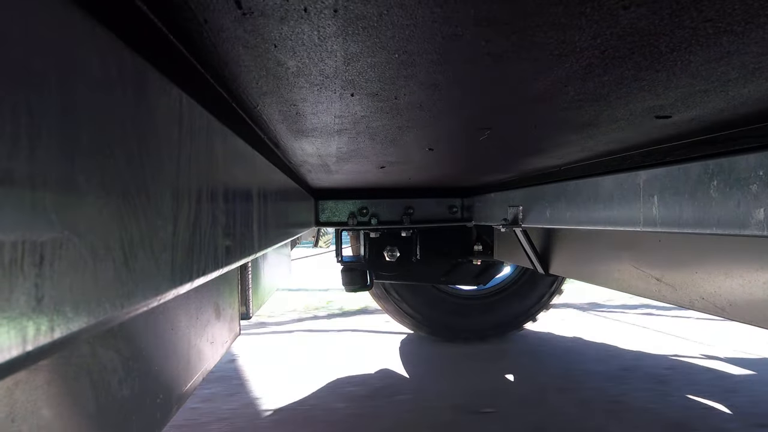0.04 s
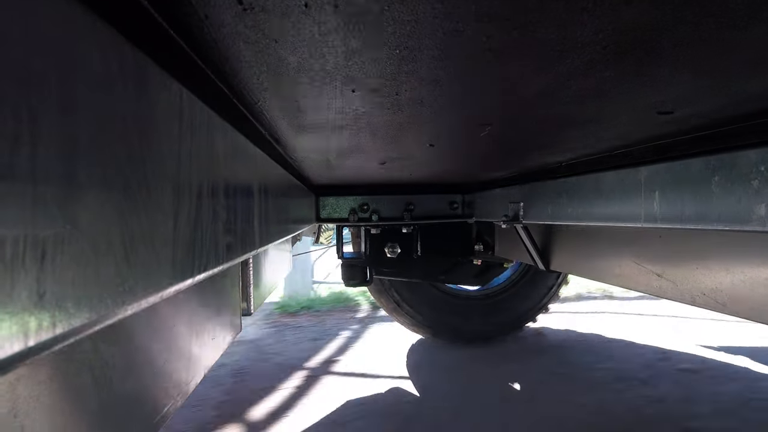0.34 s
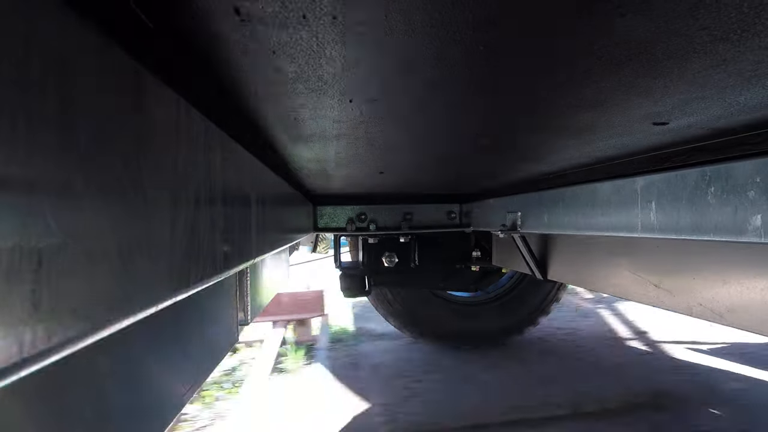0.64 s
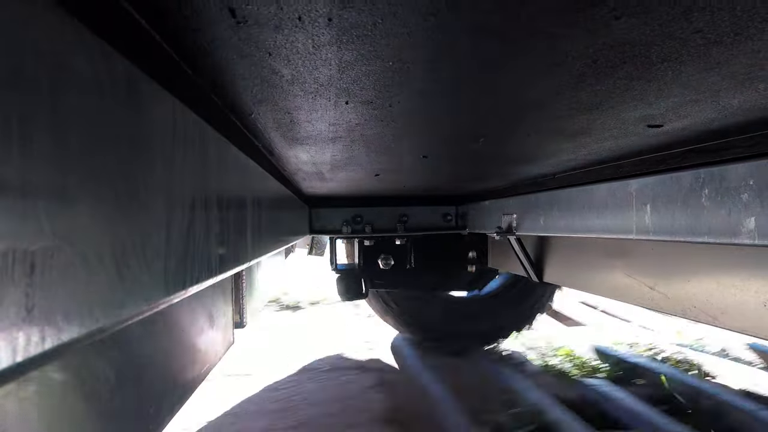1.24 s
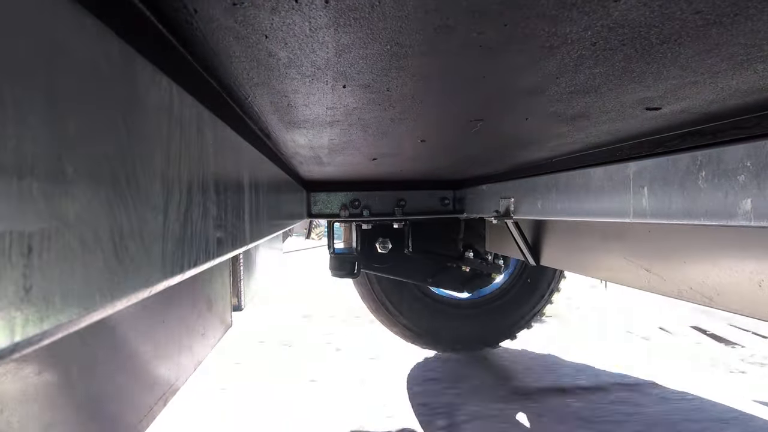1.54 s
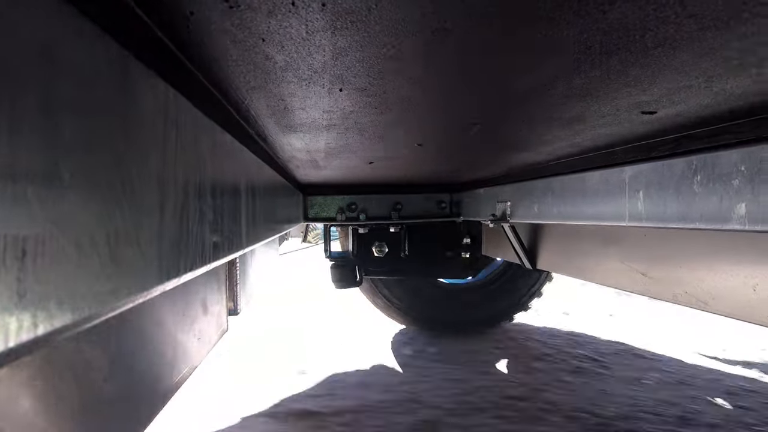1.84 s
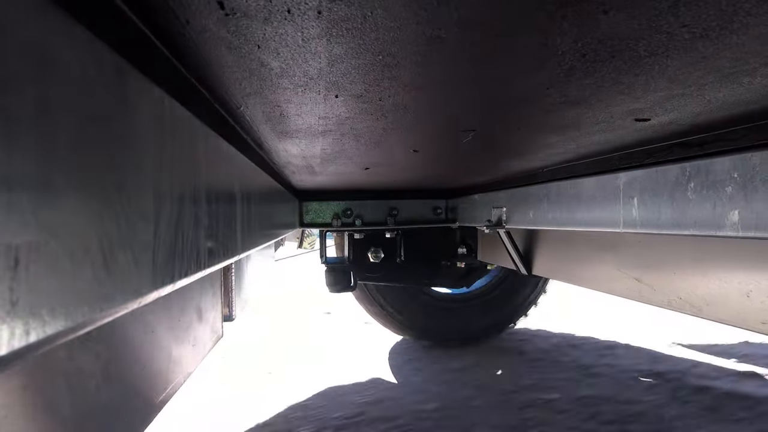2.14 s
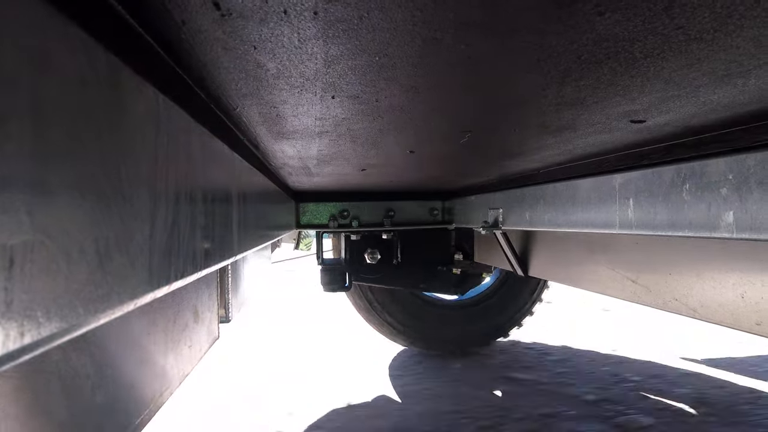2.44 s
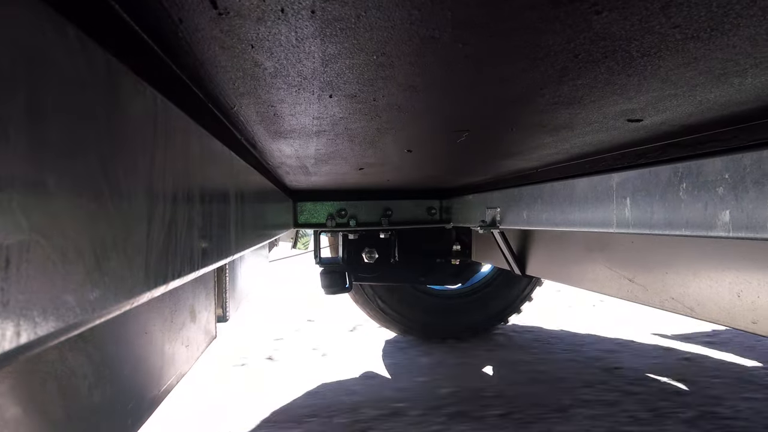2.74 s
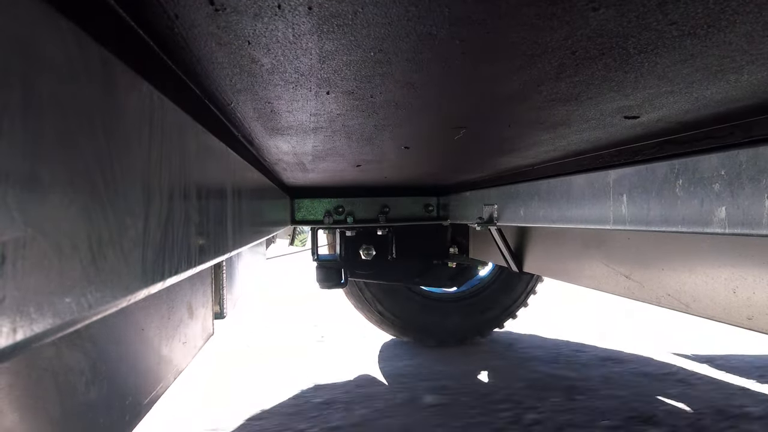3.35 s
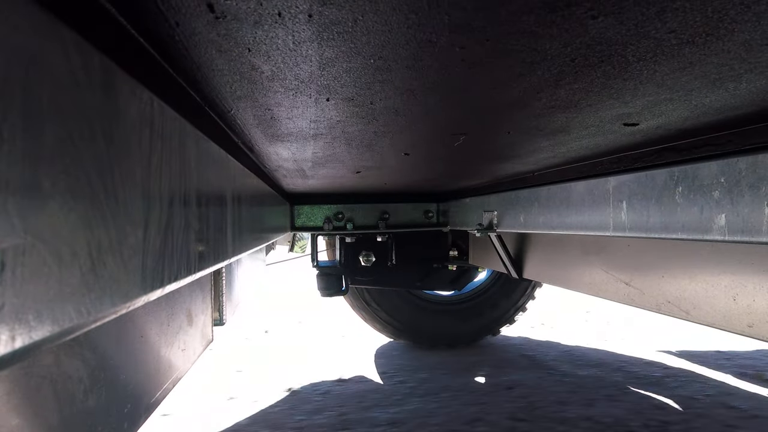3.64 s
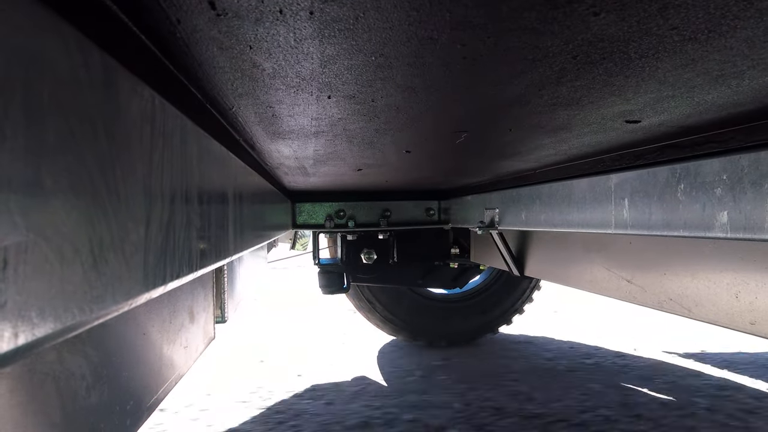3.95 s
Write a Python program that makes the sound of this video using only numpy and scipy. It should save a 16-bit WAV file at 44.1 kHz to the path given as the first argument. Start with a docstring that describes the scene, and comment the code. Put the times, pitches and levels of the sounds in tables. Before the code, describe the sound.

A metal trailer rumbles and rattles along, clanking over a cattle grid, heard from underneath.

```python
"""A hollow boom and the chatter of loose fittings come first: a metal trailer on rough ground,
with the microphone underneath, close beside a wheel. The road shakes the body, the panels drum
and the steel frame clanks. About a second in, the tyre drops onto four bars of a cattle grid;
then the trailer rolls on along a dirt track, grit crunching and stones ticking on the wheel guard."""
import sys
import numpy as np
from scipy import signal
from scipy.fft import rfft, irfft
from scipy.io import wavfile

SR = 44100
rng = np.random.default_rng(int(sys.argv[2]) if len(sys.argv) > 2 else 0)


def wav_record(signal):
    """Record a signal, one row per channel, as 16-bit PCM in the file named by sys.argv[1]."""
    frames = np.transpose(np.atleast_2d(signal))
    bounded = np.clip(frames, -1, 1)
    # unit amplitude maps onto the largest positive 16-bit level
    quanta = np.round(bounded * 32767).astype(np.int16)
    wavfile.write(sys.argv[1], SR, quanta)


N = 176400


def amp(db):
    """Decibels to gain."""
    return 10 ** (np.asarray(db) / 20)


def unit_rms(x):
    """Scales to rms 1."""
    return x / np.sqrt(np.mean(x ** 2) + 1e-20)


def read(points, hz):
    """Reads a table on a log-frequency axis."""
    f, value = np.transpose(points)
    return np.interp(np.log(hz + 1), np.log(f + 1), value)


def level(points):
    """A gain for every sample from (time [s], level [dB]) rows."""
    return amp(np.interp(np.arange(N) / SR, *np.transpose(points)))


def add(mix, start_s, sound):
    """Mixes a sound in at its start time."""
    at = round(start_s * SR)
    sound = sound[max(-at, 0):]
    part = mix[max(at, 0):][:len(sound)]
    part += sound[:len(part)]


def noise(size):
    """White noise."""
    return rng.standard_normal(size)


def coloured(x, db_at):
    """Filters x by a gain in dB over frequency, then scales to rms 1."""
    hz = np.fft.rfftfreq(len(x), 1 / SR) + 1
    return unit_rms(irfft(rfft(x) * amp(db_at(hz)), len(x)))


def octaves(hz):
    """Octaves from the middle of the metallic range."""
    return np.log2(np.clip(hz, 300, 10000) / 2000)


def ripple(hz, depth_db=7, spacing_hz=61.54):
    """The uneven response of sheet metal: random peaks and dips, in dB."""
    return depth_db * np.interp(hz / spacing_hz, np.arange(1024), noise(1024))


def mode(t, hz, db, t60):
    """One decaying resonance with a random phase."""
    return amp(db - 60 * t / t60) * np.sin(2 * np.pi * (hz * t + rng.random()))


def knock(colour, rise_s, fall_s):
    """A damped blow that dies before any pitch forms."""
    t = np.arange(32768) / SR
    envelope = np.minimum(t / rise_s, 1) * np.exp(-np.maximum(t - rise_s, 0) / fall_s)
    return coloured(noise(len(t)), colour) * envelope


# Rumble of the chassis above the microphone (frequency [Hz], gain [dB])
SWAY_COLOUR = [(8, -75), (27, 2.5), (45, -34), (120, -130)]

def sway():
    """The chassis sways slowly, at the bottom edge of hearing."""
    return amp(-29.5) * coloured(noise(N), lambda f: read(SWAY_COLOUR, f))


def cavity(centre_hz, width_hz, steadiness=0.47):
    """A resonance of the hollow body, shaken without pause by the road."""
    band = coloured(noise(N), lambda f: -20 * np.log10(1 + ((f - centre_hz ** 2 / f) / width_hz) ** 2))
    envelope = abs(signal.hilbert(band))
    steadied = band / (envelope + 0.036) ** steadiness
    return coloured(steadied, lambda f: -20 * np.log10(1 + (f / 600) ** 2))


# Deep and upper resonance of the body, heard from below (time [s], relative level [dB])
DEEP_BOOM_LEVEL = [(0, -8), (.3, -13), (.7, -15.5), (1.0, -11), (1.45, -14.5), (1.65, -18.5), (1.95, -15),
                   (2.25, -17), (2.5, -13.5), (3.65, -12.5), (3.85, -11)]
UPPER_BOOM_LEVEL = [(0, -21), (.45, -19.5), (.9, -20.5), (1.5, -19), (1.7, -23), (2.05, -16), (2.3, -24.5),
                    (2.78, -14), (2.95, -19.5), (3.5, -23.5), (4, -23.5)]

def boom():
    """The hollow body booms at two cavity resonances."""
    deep = amp(-1) * level(DEEP_BOOM_LEVEL) * cavity(centre_hz=57.1, width_hz=24.7)
    upper = amp(3) * level(UPPER_BOOM_LEVEL) * cavity(centre_hz=100.2, width_hz=59.7)
    return deep + upper


# Floor and side panels overhead (frequency [Hz], gain [dB])
PANEL_COLOUR = [(90, -6), (160, 4), (200, -3), (245, 2.5), (300, -4.5), (385, 3), (470, -8.5), (590, -3),
                (690, -19), (860, -16), (1200, -22.5), (1800, -44.5), (14000, -120)]
# Their drumming along the way (time [s], relative level [dB])
DRUM_LEVEL = [(0, -24.5), (.5, -23.5), (.62, -31.5), (.82, -28.5), (.98, -18.5), (1.4, -21), (1.62, -16),
              (1.76, -27), (1.95, -18.5), (2.25, -34.5), (2.43, -24.5), (2.9, -24), (3.25, -28.5),
              (3.65, -25.5), (4, -35.5)]

def drumming():
    """The panels drum as the trailer rolls."""
    return amp(-1.5) * level(DRUM_LEVEL) * coloured(noise(N), lambda f: read(PANEL_COLOUR, f))


# Tyre on grit, close beside the microphone (time [s], relative level [dB])
GRIT_LEVEL = [(0, -28.5), (.6, -34.5), (1.0, -32), (1.5, -32.5), (1.76, -43.5), (2.0, -37), (2.2, -43),
              (2.4, -34.5), (2.72, -37), (2.87, -32.5), (3.04, -34), (3.13, -39), (3.27, -34.5), (4, -35)]
# Colour of its crunch (frequency [Hz], gain [dB])
CRUNCH_COLOUR = [(200, -12), (560, 4), (720, -13), (950, 0), (1350, -4), (1800, -10), (2200, -18),
                 (3000, -17), (4400, -22), (5200, -26), (7500, -29), (10000, -43), (12500, -49),
                 (14500, -48), (16000, -64)]

def grit(grains_per_s=900, spread_db=2, scatter_s=0.00096, clump_hz=21.9, fizz_hz=1700):
    """Grains crunch under the tread in uneven clumps; their fizz grows faster than their body."""
    grains = noise(N) * amp(spread_db * np.minimum(rng.exponential(1, N), 4))
    grains *= rng.random(N) < grains_per_s / SR
    t = np.arange(1024) / SR
    scatter = noise(len(t)) * np.exp(-t / scatter_s)
    crunch = unit_rms(signal.oaconvolve(grains, scatter)[:N])
    clumps = amp(coloured(noise(N), lambda f: -20 * np.log10(1 + (f / clump_hz) ** 2 + (5 / f) ** 2)))
    hiss = 0.9 * noise(N)
    sound = coloured(crunch + hiss, lambda f: read(CRUNCH_COLOUR, f) + ripple(f, depth_db=3.5))
    low = irfft(rfft(sound) / (1 + (np.fft.rfftfreq(N, 1 / SR) / fizz_hz) ** 4), N)
    load = level(GRIT_LEVEL)
    fizz = (sound - low) * (load / amp(-37)) ** 0.6
    return load * clumps * (low + fizz)


# Stones off the track, at the near wheel (time [s], level [dB], brightness [dB/octave])
STONE_HITS = [(0.523, -19.5, -1), (0.887, -33, -5), (0.926, -25.5, -0.5), (1.508, -22.5, -8),
              (1.874, -28, -1.5), (1.889, -22.5, -2), (1.92, -33.5, 2.5), (2.041, -36, 3),
              (2.44, -29.5, -.5), (2.523, -28.5, 0), (2.543, -27.5, -3), (2.899, -33.5, 2.5),
              (3.028, -33.5, 4), (3.057, -26.5, 1), (3.114, -37, 0.5), (3.432, -25.5, 0.5),
              (3.622, -27.5, -2), (3.705, -18, -2.5), (3.775, -21, -3), (3.784, -28.5, -7)]
# Colour of their knock (frequency [Hz], gain [dB])
STONE_KNOCK_COLOUR = [(150, -18), (550, 6), (720, -3), (1000, 7), (1750, -3), (2300, -6.5), (5300, -16),
                      (7500, -20.5), (11000, -37.5), (15000, -51.5)]
# Modes of the wheel guard (frequency [Hz], level [dB], t60 [s])
WHEEL_GUARD_MODES = [(943, -3, .1), (1220, -7.5, 0.11), (1766, -5, 0.052)]

def stones(mix):
    """Stones knock on the wheel guard, which rings briefly; some knocks are dull, others bright."""
    for start_s, db, bright_db in STONE_HITS:
        colour = lambda f: read(STONE_KNOCK_COLOUR, f) + bright_db * octaves(f)
        sound = knock(colour, rise_s=0.0011, fall_s=0.017)
        t = np.arange(len(sound)) / SR
        for hz, mode_db, t60 in WHEEL_GUARD_MODES:
            detuned_hz = hz * (1 + 0.021 * noise(1))
            envelope = amp(mode_db + bright_db * octaves(hz) - 60 * t / t60)
            sound += envelope * np.sin(2 * np.pi * detuned_hz * t)
        add(mix, start_s, amp(db) * sound)


# Jolts in the panels overhead (time [s], level [dB], centre [Hz], fall time [s])
JOLTS = [(0.136, -12.5, 253, 0.011), (0.216, -10.5, 222, 0.012), (.394, -14.5, 206, 0.069),
         (.863, -15.5, 253, 0.027), (1.003, -20.5, 602, 0.031), (1.509, -12, 475, 0.088),
         (1.833, -10, 218, 0.029), (1.872, -15, 392, 0.046), (2.03, -13.5, 360, 0.016),
         (2.545, -19.5, 407, 0.052), (2.899, -15, 282, 0.01), (3.056, -14, 510, 0.017),
         (3.322, -14, 283, 0.014), (3.621, -18.5, 530, 0.013)]

def thumps(mix, half_width_octaves=0.38):
    """Each jolt thumps the panels in one narrow band."""
    for start_s, db, hz, fall_s in JOLTS:
        band_db = lambda f: -10 * np.log10(1 + (np.log2(f / hz) / half_width_octaves) ** 4)
        thump = knock(lambda f: read(PANEL_COLOUR, f) + band_db(f), rise_s=0.0057, fall_s=fall_s)
        add(mix, start_s, amp(db) * thump)


# Full ring time of the steel frame above the microphone (frequency [Hz], t60 [s])
FRAME_RING = [(200, 0.084), (900, 0.8), (2500, 0.58), (6000, 0.49), (8500, 0.27), (15000, 0.7)]
# Its clear modes (frequency [Hz], relative level [dB], full t60 [s])
FRAME_MODES = [(595, -3.5, 0.32), (855, -6.5, 0.83), (1213, 2.5, 0.14), (2134, -24.5, .4),
               (2930, -11, 0.28), (4040, -20.5, 0.16), (5420, -16.5, .45), (5895, -23.5, 0.51)]

def frame_blow(spectrum, bright_db, crack_db, sustain, crack_s=0.0055):
    """One blow on the frame: a crack, a dense ring that dulls, and a few clear modes."""
    size = 32768
    t = np.arange(size) / SR
    colour = lambda f: read(spectrum, f) + bright_db * octaves(f) + ripple(f)
    hz, when, bands = signal.stft(coloured(noise(size), colour), SR, nperseg=256)
    decay = amp(-60 * when / (sustain * read(FRAME_RING, hz)[:, None]))
    ring = signal.istft(bands * decay, SR)[1][:size]
    modes = sum(mode(t, f, db + bright_db * octaves(f), sustain * t60) for f, db, t60 in FRAME_MODES)
    crack = coloured(noise(size), colour) * amp(crack_db) * np.exp(-(t / crack_s) ** 2)
    attack = np.minimum(t / 0.000074, 1)
    return (ring + amp(-6.5) * modes + crack) * attack


# Bouts of chatter, heard from under the frame
# (time [s], length [s], level [dB], brightness [dB/octave], jingle [dB], pitch [Hz])
RATTLE_BOUTS = [(-.03, 0.075, -19, -2, -13, 1926), (0.086, 0.074, -20, -0.5, 5.5, 1486),
                (0.159, 0.092, -26, -2.2, -14, 1555), (0.397, 0.086, -19, -3, -10, 1180),
                (.479, 0.047, -26, 0.8, -9, 1798), (0.669, 0.12, -26, -1.5, -5, 1950),
                (1.063, 0.045, -30.5, 0, 5.5, 2087), (1.17, 0.023, -23, -13, 3, 3080)]
# Colour of the frame under a fitting's blows (frequency [Hz], gain [dB])
RATTLE_COLOUR = [(200, -16), (550, 9.5), (700, -1.5), (950, -4), (1900, 0.5), (2800, -3.5), (4000, -9.5),
                 (6100, -12.5), (7200, -21.5), (11000, -24.5), (12500, -38), (14500, -42)]
# Modes of a fitting (frequency [multiple of its pitch], level [dB])
FITTING_MODES = [(1, 1), (1.037, -5), (1.993, -8), (2.272, -6.5), (2.94, -10), (3.269, -6.5)]

def rattles(mix, blows_per_s=460, spread_db=2, jingle_t60_s=0.11, top_hz=5500):
    """Loose fittings chatter against the frame in swells of small blows; both ring."""
    for start_s, length_s, db, bright_db, jingle_db, pitch_hz in RATTLE_BOUTS:
        progress = np.arange(0, 1, 1 / (length_s * SR))
        size = len(progress)
        swell = np.sin(np.pi * progress ** 0.81) ** 0.7
        blows = rng.choice([-1, 1], size) * amp(spread_db * noise(size))
        blows *= rng.random(size) < blows_per_s / SR
        ring = frame_blow(RATTLE_COLOUR, bright_db, crack_db=8.0, sustain=0.37)
        t = np.arange(len(ring)) / SR
        jingle = np.zeros(len(t))
        for ratio, mode_db in FITTING_MODES:
            hz = pitch_hz * ratio
            envelope = amp(jingle_db + mode_db - 60 * t / jingle_t60_s)
            jingle += envelope * np.sin(2 * np.pi * hz * t) / (1 + (hz / top_hz) ** 4)
        chatter = signal.fftconvolve(blows * swell, ring + jingle)
        bout_rms = np.sqrt(np.sum(chatter ** 2) / size + 1e-20)
        add(mix, start_s, amp(db) * chatter / bout_rms)


# Clanks just overhead, thickest at the cattle grid
# (time [s], level [dB], brightness [dB/octave], crack against ring [dB], ring time [share of full])
FRAME_CLANKS = [(.2555, -16, -1, -9, 0.13), (.394, -20.5, -5, -8, 0.6), (.748, -30, -1.5, 13, 0.69),
                (.964, -15, -4, -28, 0.52), (.969, -28, 9.5, 6, 0.48), (.992, -16, -0.5, -27, 0.25),
                (1.171, -14, -2.8, -19, 0.3), (1.183, -18.5, -1.5, -18, 0.54), (1.285, -16, -5, 0, 0.73),
                (1.305, -19, 2.5, 15.5, 1), (1.3455, -17, 0, 3, 0.47), (1.357, -25.5, -2, -12, 0.5),
                (1.462, -29, -3.5, 3, 1)]
# Colour of the struck steel (frequency [Hz], gain [dB])
CLANK_COLOUR = [(150, -22), (400, -2.5), (600, 0), (700, -1.5), (850, 4.5), (1200, -4.5), (1400, -8),
                (2000, -3), (3000, -4), (4000, -7.5), (5000, -7.5), (6100, -10), (7000, -15), (8500, -17),
                (10500, -29.5), (12300, -48), (13300, -40.5), (15500, -48)]

def clanks(mix):
    """Single hard blows set the steel frame ringing."""
    for start_s, db, bright_db, crack_db, sustain in FRAME_CLANKS:
        add(mix, start_s, amp(db) * frame_blow(CLANK_COLOUR, bright_db, crack_db, sustain))


# The tyre drops on the bars, just below the microphone (time [s], level [dB])
BAR_HITS = [(1.014, -1.5), (1.096, -3), (1.152, -5), (1.228, -7)]
# Modes of a bar (frequency [Hz], level [dB], t60 [s])
GRID_BAR_MODES = [(206.7, -8, 0.28), (249, -1, 0.075), (281.9, -1, .2), (322, 0, .13), (599.6, -17, 0.056)]

def cattle_grid(mix, rise_s=0.021):
    """The bars ring in turn, each with the soft attack of rubber on metal."""
    t = np.arange(16384) / SR
    attack = np.minimum(t / rise_s, 1)
    for start_s, db in BAR_HITS:
        ring = sum(mode(t, *row) for row in GRID_BAR_MODES)
        add(mix, start_s, amp(db) * ring * attack)


def scene():
    """Rolling noise with every blow on top, at one microphone beside the wheel."""
    mix = sway() + boom() + drumming() + grit()
    clanks(mix)
    stones(mix)
    thumps(mix)
    cattle_grid(mix)
    rattles(mix)
    return mix[None]


def record(dry):
    """The loudest peaks are rounded off, then the highest treble is cut."""
    ceiling, edge_hz = 0.78, 15400
    rounded = dry / (1 + (dry / ceiling) ** 6) ** (1 / 6)
    lowpass = signal.firwin(511, edge_hz, window=("kaiser", 9), fs=SR)
    return signal.oaconvolve(rounded, lowpass[None], "same")


dry = scene()
out = record(dry)
wav_record(out)
```